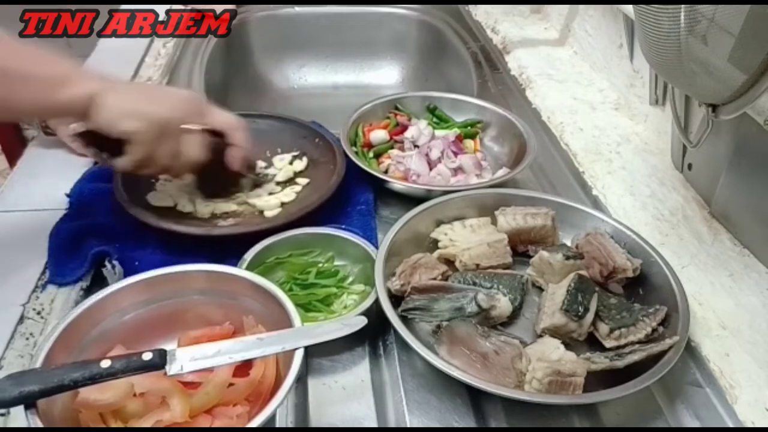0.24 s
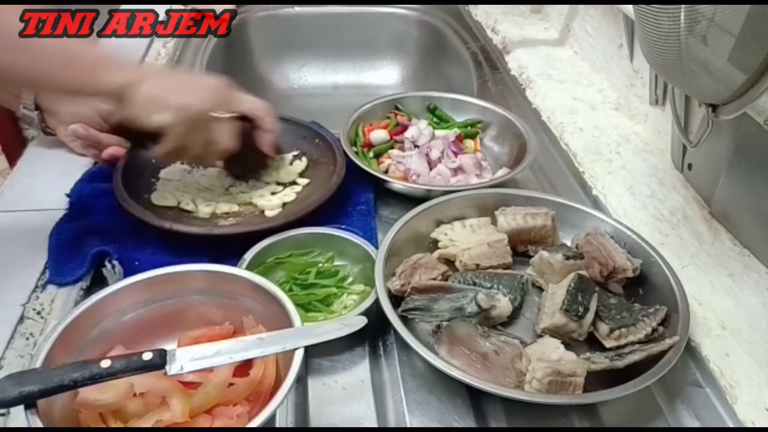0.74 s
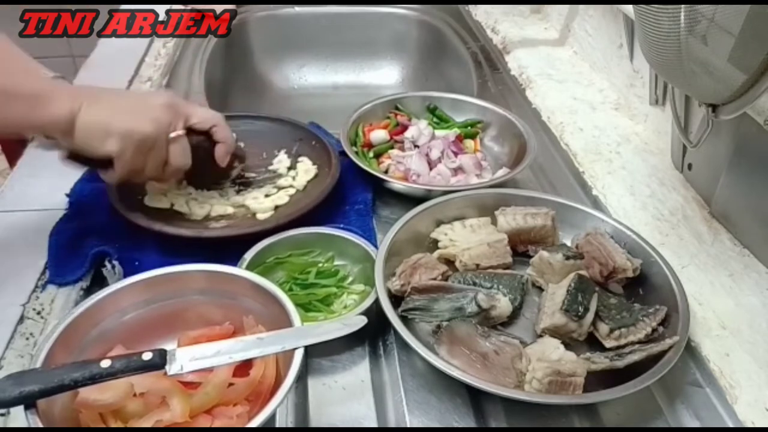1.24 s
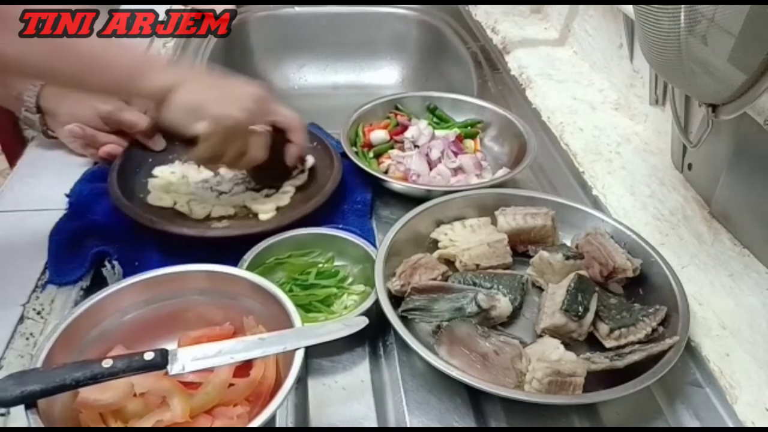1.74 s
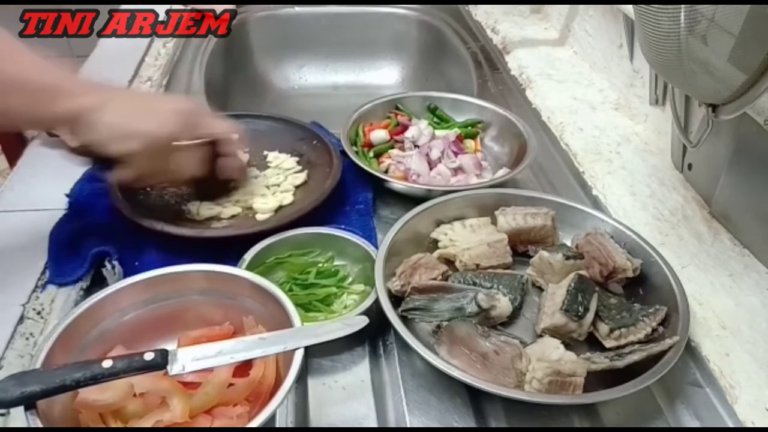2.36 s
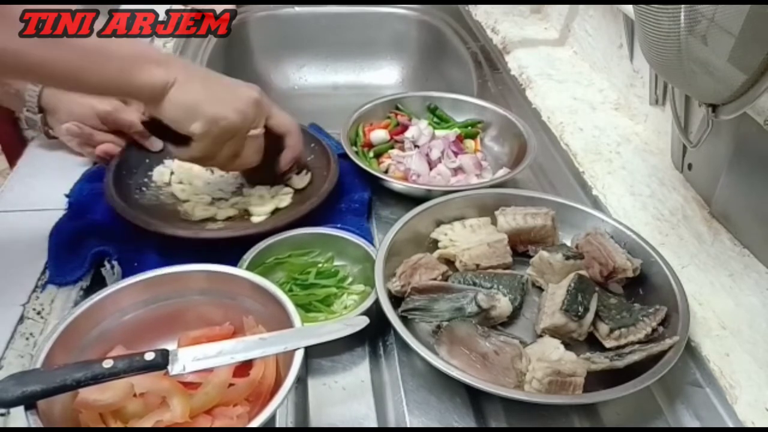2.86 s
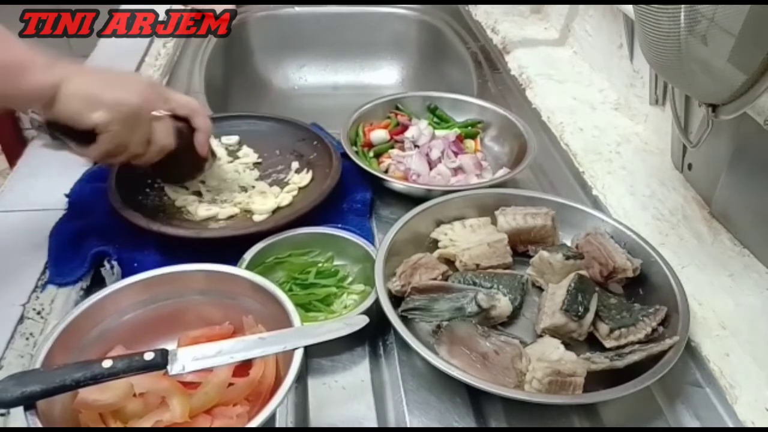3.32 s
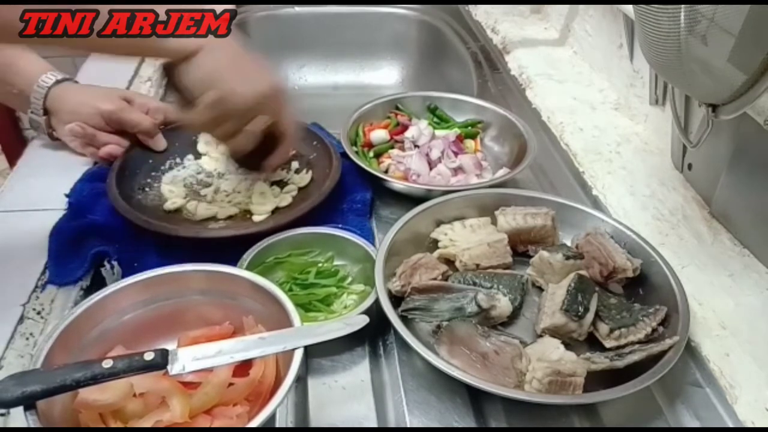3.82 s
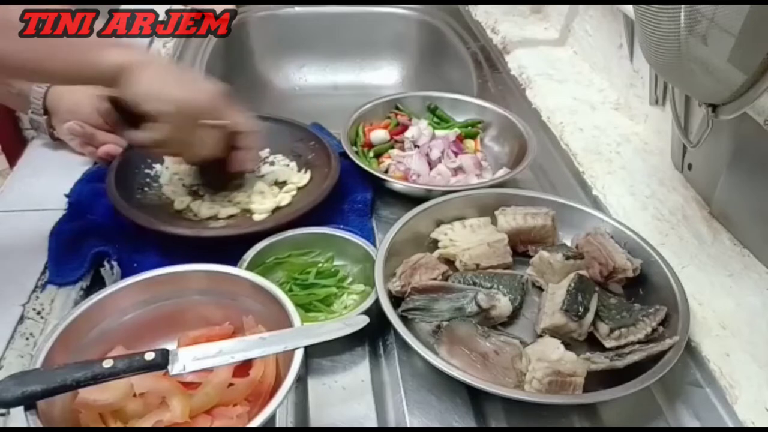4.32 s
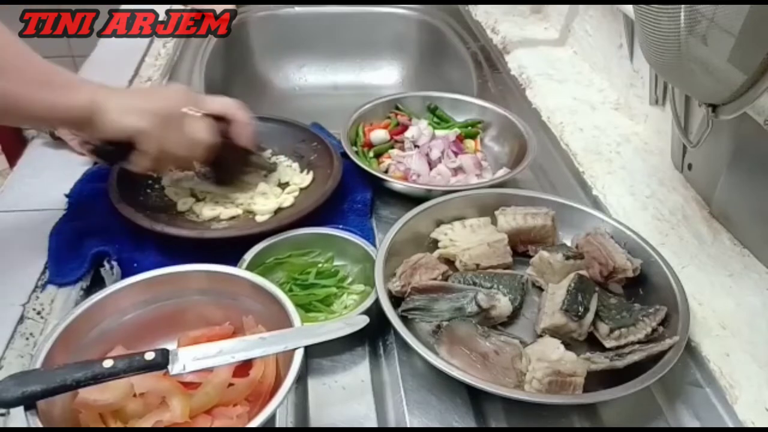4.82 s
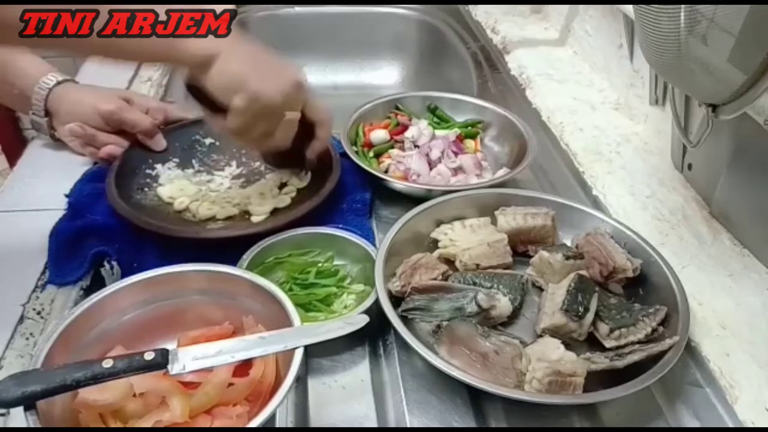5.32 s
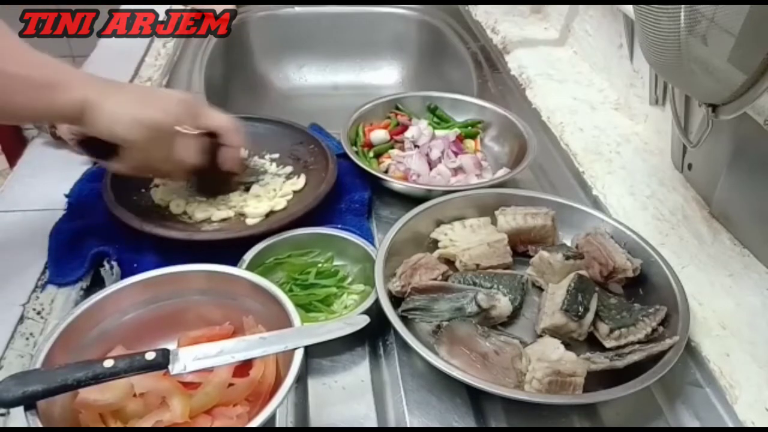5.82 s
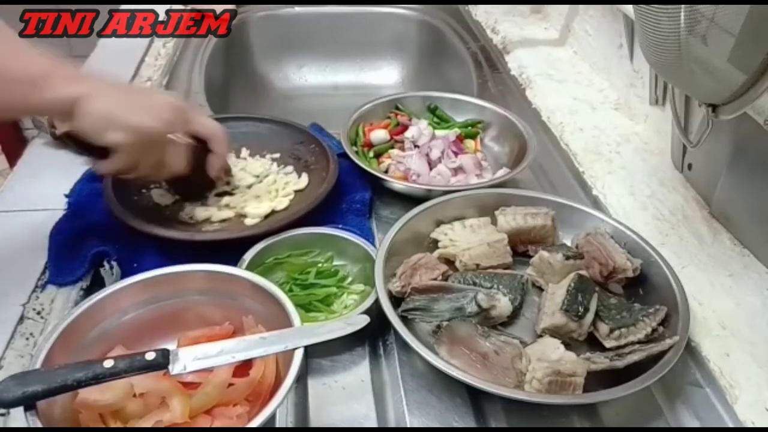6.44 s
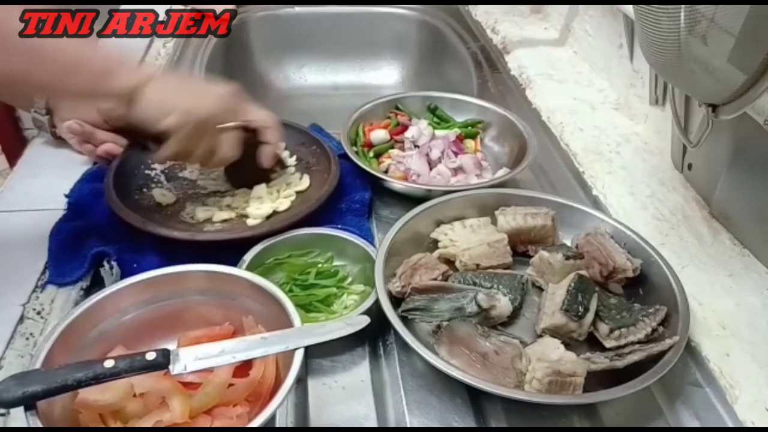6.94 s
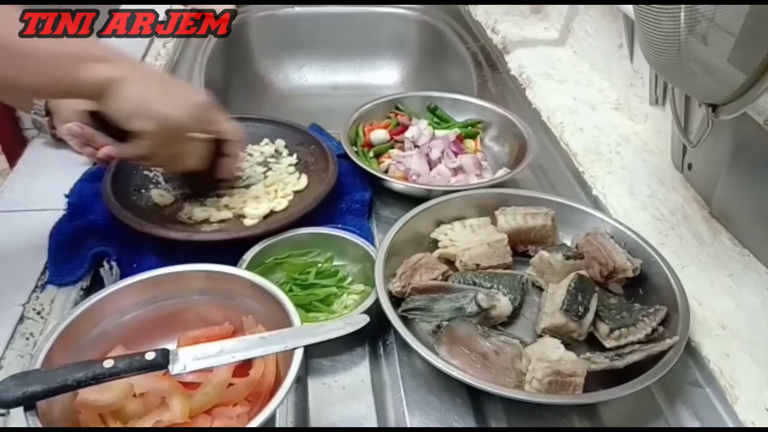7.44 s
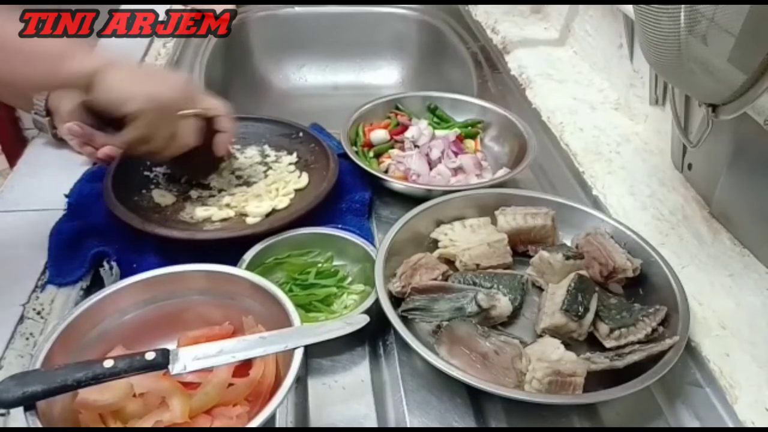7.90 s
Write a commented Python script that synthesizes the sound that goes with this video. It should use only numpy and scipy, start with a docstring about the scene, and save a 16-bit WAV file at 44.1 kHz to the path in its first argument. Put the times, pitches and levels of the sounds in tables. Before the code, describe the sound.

In a small kitchen, garlic is crushed close to the microphones, slightly to the left. Two sharp stone knocks come early, among quick scraping strokes of a pestle on a flat mortar. The gritty, moist grinding carries on throughout, broken by short lifts, further clacks and a few tiny squeaks and crunches. The mortar thuds softly on the counter, and nearby steel bowls ring faintly over a quiet low hum.

```python
"""Crushing garlic in a stone mortar

A stone pestle lands with a knock on a flat mortar, which sits on a cloth beside a steel sink.
It rubs to and fro: grit rasps, the slab rumbles under the weight, wet pulp fizzes, the stone squeaks.
Cloves burst, the rocking mortar thuds on the counter and steel bowls ring faintly in sympathy.
A small kitchen with a low drone surrounds a close pair of microphones."""
import sys
import numpy as np
from scipy import signal
from scipy.fft import rfft, irfft
from scipy.io import wavfile
from scipy.ndimage import uniform_filter1d

SR = 44100
rng = np.random.default_rng(int(sys.argv[2]) if len(sys.argv) > 2 else 0)


def wav_out(sig):
    """Save sig, one row per channel (or a flat mono array), as 16-bit PCM at SR to the path in sys.argv[1]."""
    wavfile.write(sys.argv[1], SR, np.round(np.clip(np.atleast_2d(sig).T, -1, 1) * 32767).astype(np.int16))


N = 360297
HZ = np.fft.rfftfreq(8192, 1 / SR)  # frequency axis of the filter spectra


# Rubs: t/s of peak speed, rise/s, fall/s, grit level/dB, slab and pulp level/dB relative to the grit
RUBS = [(0.004, 0.025, 0.05, -53, -6, -7), (0.144, 0.049, 0.074, -44.5, 1.5, -12.0),
        (0.212, 0.054, 0.032, -46, -10, 6), (0.256, 0.02, 0.025, -38.5, -19, -2.5),
        (0.355, 0.11, 0.066, -34.5, -7.5, -5), (0.482, 0.036, 0.074, -45.5, -4.5, 2.0),
        (0.587, 0.051, 0.16, -33, -6.0, -8.5), (0.925, 0.019, 0.036, -47, -5, 5.5),
        (0.995, 0.078, 0.067, -35, -6.0, -1), (1.077, 0.037, 0.053, -49, -6.0, 4),
        (1.201, 0.048, 0.073, -43.5, -14, 5.5), (1.368, 0.065, 0.059, -31, -6.5, -4),
        (1.512, 0.094, 0.064, -40.0, -9.5, 0.0), (1.605, 0.04, 0.072, -31.5, -6.0, -9.5),
        (1.903, 0.076, 0.074, -40.5, -3.5, 1.5), (2.035, 0.09, 0.072, -28, -6.0, -8.5),
        (2.347, 0.054, 0.093, -51.5, 8, 4.5), (2.402, 0.068, 0.15, -28, -6.5, -11.5),
        (2.592, 0.067, 0.055, -44, -13.5, -1), (2.659, 0.024, 0.043, -39, -8, -7),
        (2.717, 0.029, 0.085, -33.5, -6.5, -7.5), (2.927, 0.016, 0.1, -47.5, 8.5, -9),
        (2.984, 0.043, 0.14, -41.5, -8, 2), (3.142, 0.071, 0.081, -28.5, -7.5, -9),
        (3.284, 0.049, 0.075, -33.0, -5, -7), (3.416, 0.056, 0.078, -28.5, -6.0, -9.5),
        (3.778, 0.076, 0.078, -28, -4.5, -10.0), (3.923, 0.035, 0.073, -30.5, -8.5, -5.5),
        (4.053, 0.045, 0.12, -33, -6, -7.5), (4.286, 0.027, 0.12, -47, 1.5, -5),
        (4.364, 0.066, 0.061, -37, -1.5, 1.5), (4.487, 0.058, 0.13, -33.5, -6, -4.5),
        (4.651, 0.035, 0.059, -27.0, -7.5, -11.0), (4.787, 0.072, 0.1, -32.0, -7, -8),
        (5.093, 0.036, 0.047, -41, 0, -7), (5.186, 0.074, 0.089, -28.0, -4, -9.5),
        (5.394, 0.094, 0.039, -41.5, -11, -2.5), (5.512, 0.09, 0.075, -34.5, -3, -9),
        (5.701, 0.034, 0.083, -46.5, 7.5, -6), (5.763, 0.072, 0.062, -41.5, -2.5, 1),
        (5.919, 0.087, 0.068, -31.0, -7, -11.0), (6.063, 0.064, 0.062, -34, -1.5, -10),
        (6.188, 0.064, 0.084, -33.5, -3.5, -10), (6.462, 0.019, 0.031, -40.0, 4.5, -1.0),
        (6.565, 0.073, 0.082, -29.5, -7, -8), (6.753, 0.057, 0.06, -36.5, -10.5, -8),
        (6.892, 0.13, 0.07, -34.5, -4, -9), (7.14, 0.088, 0.03, -42.5, 1, -3.5),
        (7.254, 0.078, 0.088, -31.0, -5.5, -12), (7.498, 0.067, 0.42, -40, -8.5, -5),
        (7.603, 0.096, 0.14, -34.5, -3, -11), (7.781, 0.036, 0.088, -35.5, -8.5, -10.5),
        (7.92, 0.1, 0.12, -38.0, -1.5, -9.5), (8.152, 0.041, 0.037, -46.0, 0.0, -13)]
# Friction spectra of grit, loaded slab and wet pulp: f/Hz, level/dB
GRIT_SPECTRUM = [(300, -36.5), (700, -26), (1100, -10), (1800, -1.5), (2400, 1.5), (3000, -3), (3800, -6),
                 (5000, -12.5), (8000, -58.5), (16000, -70)]
SLAB_SPECTRUM = [(30, -27), (60, -13), (90, -1.5), (170, -10.5), (290, 3), (390, -2.5), (550, -4.5),
                 (800, -8.5), (1150, -9.5), (1700, -8.5), (4000, -53)]
PULP_SPECTRUM = [(1500, -29), (3000, 0.5), (4000, -3), (5200, -1.5), (6300, -2), (7200, -7.5),
                 (8300, -13.5), (10000, -22.5), (13000, -28), (15500, -24.5)]
def rubbing():
    """Sliding friction: the strokes of the arm modulate the noise of grit, slab and pulp together."""
    slab_db, pulp_db = np.transpose(RUBS)[-2:]
    light = pressure(np.zeros(len(RUBS)), growth=1, lag_s=0)
    heavy = pressure(slab_db, growth=1.09, lag_s=0.0044)  # the slab answers late, most to hard pressure
    wet = pressure(pulp_db, growth=0.79, lag_s=-0.0024)  # pulp fizzes early, even under a light touch
    wet = np.hypot(wet, squishes())
    grit = light * friction(fractures(per_s=2600, spread_db=3.5), GRIT_SPECTRUM)
    slab = amp(-1) * heavy * friction(fractures(per_s=3600, spread_db=3), SLAB_SPECTRUM)
    pulp = amp(-0.27) * wet * friction(fractures(per_s=2200, spread_db=4.5), PULP_SPECTRUM)
    pulp *= flutter(rate_hz=270, depth_db=0.46)
    pitted_stone = flutter(rate_hz=130, depth_db=0.76)
    return contact() * (grit + slab + pulp) * pitted_stone


def pressure(offsets_db, growth, lag_s, swing_db=20):
    """Incoherent addition: the swells of the rubs sum in power; growth steepens their flanks."""
    t, power = np.arange(0, N, 64) / SR, 0
    for (s, rise, fall, db, _, _), offset_db in zip(RUBS, offsets_db):
        age = t - s - lag_s
        from_peak = np.where(age < 0, abs(age / rise) ** 1.73, abs(age / fall) ** 1.32)
        power += amp(db + offset_db - growth * swing_db * from_peak) ** 2
    return np.interp(np.arange(N) / SR, t, np.sqrt(power))


def fractures(per_s, spread_db):
    """Shot noise: tiny fractures form a random impulse train, many small and a few large."""
    size = amp(spread_db * np.minimum(rng.exponential(1, N), 4))
    return unit(size * rng.choice([-1, 1], N) * (rng.random(N) < per_s / SR))


# Resonances of the mortar: f/Hz, bandwidth/Hz, gain/dB
MORTAR_MODES = [(229, 57, 6.0), (297, 26, 5.0), (382, 18, -5.0), (482, 105, 8.5), (588, 32, 8.0),
                (634, 30, 5.0), (720, 99, 5.5), (885, 87, 6.5), (973, 19, -3.0), (1078, 27, 3.5),
                (1214, 105, 6.0), (1373, 22, 4.5), (1607, 18, -2.0), (1776, 52, 6.5), (1881, 30, 4.0),
                (1967, 111, 5.0), (2073, 30, 4.0), (2181, 24, 3.0), (2336, 125, 5.5), (2442, 160, 4.0),
                (2603, 50, 2.5), (2788, 31, 4.0), (3475, 224, 5.0), (4612, 297, 3.0), (6068, 611, 7.5),
                (7895, 515, 3.0)]
def friction(train, spectrum):
    """Forced vibration: fractures drive the modes of the stone, heard directly and scattered."""
    stone = colour(train, read(spectrum) + resonances(MORTAR_MODES))
    return unit(amp(-3.5) * direct(stone) + scatter(stone))


# Lifts of the pestle: t/s of leaving, t/s of touching again, squish level/dB
PESTLE_LIFTS = [(0.03, 0.092, -52), (0.649, 0.874, -51), (1.115, 1.155, -45), (1.77, 1.806, -70),
                (2.14, 2.283, -57), (2.82, 2.912, -46.5), (3.542, 3.659, -51), (4.14, 4.265, -46.5),
                (4.867, 5.046, -59), (5.58, 5.676, -52), (6.295, 6.447, -50), (7.353, 7.44, -49),
                (8.025, 8.118, -48.5)]
def contact(peel_db_per_s=129, touch_s=0.003):
    """Adhesion: contact (0 to 1) fades as the pestle peels off sticky pulp and returns on landing."""
    t, touch = np.arange(N) / SR, np.ones(N)
    for leaves, lands, _ in PESTLE_LIFTS:
        lifted = (t > leaves) & (t < lands + touch_s)
        peeling = amp(-peel_db_per_s * (t[lifted] - leaves))
        landing = np.clip((t[lifted] - lands) / touch_s, 0, 1)
        touch[lifted] = np.maximum(peeling, landing)
    return touch


def squishes(decay_s=0.012):
    """Squeeze flow: each touch-down presses out a spurt of fizz, given here as an envelope."""
    t, envelope = np.arange(SR // 5) / SR, np.zeros(N)
    for _, lands, db in PESTLE_LIFTS:
        add(envelope, lands, amp(db) * np.exp(-t / decay_s))
    return envelope


# The pestle lands or trips: t/s, level/dB, contact cutoff f/Hz, relative click level/dB
IMPACTS = [(0.0934, -0.5, 3420, -4.5), (0.106, -10, 2370, -4), (0.250, -26, 5000, -8),
           (0.8800, 0.5, 3930, 6.5), (1.160, -41, 7000, -10), (1.345, -13.5, 4000, -8),
           (1.570, -27, 5000, -10), (1.895, -32, 2000, -9), (2.325, -15.5, 2500, 1),
           (2.354, -9.5, 3000, -9), (2.649, -17.5, 4000, -15), (2.9137, -15, 5500, 0),
           (3.715, -18.5, 5000, -9), (3.908, -31, 3500, -12), (4.269, -17, 3020, 0),
           (4.281, -13.5, 1200, -2), (4.445, -27, 5004, -11), (4.617, -24, 4000, -12),
           (4.644, -9.5, 3500, 0), (5.0434, 1, 3400, 7.5), (5.141, -10, 4000, -11), (5.6765, -7, 1670, 5),
           (5.692, -12.5, 1290, -11), (6.4453, -16, 4500, -1), (6.452, -10.5, 1370, -1),
           (6.521, -7.5, 4003, -14), (7.106, -13.5, 2560, -6), (8.118, -22, 5610, -1)]
# Spectrum of an impact: f/Hz, level/dB
IMPACT_SPECTRUM = [(40, -54.5), (150, -13.5), (350, -13.5), (550, -1.5), (1000, 1.5), (1600, 3), (2400, 3),
                   (3300, -6), (4500, -7), (6000, -13.5), (7300, -14.5), (9000, -27.5), (15000, -41.5)]
# Resonances of the pestle: f/Hz, bandwidth/Hz, gain/dB
PESTLE_MODES = [(631, 210, 2.5), (1670, 150, 4), (2115, 130, -10), (2340, 250, 8.5), (3270, 240, 10.5),
                (4040, 210, -3), (4580, 420, 7), (5300, 440, -13.5), (5850, 450, 12.5), (7330, 290, 11)]
def knocks():
    """Impact of stone on stone: a click and a short ring; garlic in between lowers the cutoff."""
    rings, clicks = np.zeros((2, N))
    body = resonances(PESTLE_MODES) + 0.5 * resonances(MORTAR_MODES)
    for s, db, cutoff_hz, click_db in IMPACTS:
        blow = read(IMPACT_SPECTRUM) - 10 * np.log10(1 + (HZ / cutoff_hz) ** 4)
        add(rings, s, amp(db + 5) * response(blow + body))
        add(clicks, s, amp(db + click_db - 4) * response(blow))
    return direct(clicks) + scatter(rings)


# The stone catches, and once a bowl rings (the first row, a faint 700 Hz steel ring while the pestle is
# lifted): t/s of the middle, duration/s, level/dB, f/Hz, half-width/Hz
STICK_SLIPS = [(.715, 0.097, -60, 703, 25), (2.385, 0.076, -34, 2470, 200), (2.401, .11, -36, 790, 450),
               (2.447, .04, -25.5, 6080, 150), (2.478, 0.041, -35.5, 1400, 50.5),
               (3.915, 0.048, -29.5, 1830, 200), (4.292, 0.051, -39.5, 760, 120),
               (5.012, 0.067, -67, 3520, 149), (5.622, 0.034, -49, 2520, 70), (6.4, .03, -65, 4500, 150),
               (7.512, 0.15, -38, 970, 348), (7.598, 0.087, -37.5, 735, 400),
               (8.056, 0.2, -57.5, 723, 69.4), (8.153, 0.049, -42.5, 850, 91)]
def squeaks():
    """Stick-slip friction: irregular slips feed one narrow resonance for a moment; the same shape gives the one
    short ring of a bowl."""
    out = np.zeros(N)
    for s, length, db, hz, width in STICK_SLIPS:
        ring = response(-20 * np.log10(1 + ((HZ - hz) / width) ** 2))
        slips = rng.standard_normal(len(ring) + int(length * SR))
        tone = signal.fftconvolve(slips, ring, "valid")
        add(out, s - length / 2, amp(db) * unit(tone) * np.hanning(len(tone)))
    return out


# A clove bursts: t/s, level/dB, time constant/s
CLOVE_BURSTS = [(0.092, -42, 0.0016), (0.208, -48, .008), (1.343, -52, .012), (2.431, -30, 0.01),
                (2.446, -39, 0.0066), (6.449, -51, 0.0043)]
def bursts():
    """Rupture: the cells of a clove tear in a bright crackle that decays exponentially."""
    t, envelope = np.arange(SR // 10) / SR, np.zeros(N)
    for s, db, decay_s in CLOVE_BURSTS:
        add(envelope, s, amp(db) * np.exp(-t / decay_s))
    bright = read([(1000, -15), (4000, -5), (7000, 8.5), (9000, -4.5), (15000, -16)])
    return envelope * colour(fractures(per_s=4200, spread_db=4), bright)


# The mortar rocks: t/s, level/dB
MORTAR_ROCKS = [(.345, -46), (.61, -53), (1.64, -43.5), (2.385, -46), (2.45, -47), (3.28, -49.5),
                (3.79, -46), (3.92, -49), (4.85, -49), (4.985, -54.5), (5.4, -55), (5.78, -53), (6.1, -50),
                (6.46, -50), (6.55, -46.5)]
# Spectrum of the counter: f/Hz, level/dB
COUNTER_SPECTRUM = [(25, -27), (45, -12), (58, -5.5), (70, -9), (85, 3), (105, 3.5), (135, -4.5),
                    (200, -21.5), (500, -67)]
def thuds(half_length_s=0.038):
    """Structure-borne sound: the rocking mortar pushes through its cloth and the counter booms."""
    t = np.arange(N) / SR
    push = sum(amp(db) * np.exp(-((t - s) / half_length_s) ** 2) for s, db in MORTAR_ROCKS)
    return push * rumble(COUNTER_SPECTRUM)


# Modes of the steel bowls: f/Hz, level/dB, T60/s
BOWL_MODES = [(1344, -5, 0.42), (1900, -13, 0.62), (2640, -16, 0.35), (4130, -12.5, 0.41),
              (4600, -20, 0.43), (5430, -13, 0.34), (5860, -16, 0.64), (6540, -16, 0.35)]
# The bowls are jogged: t/s, level/dB, f/Hz of strongest excitation
BOWL_JOGS = [(0.67, -42, 2940), (2.469, -38, 3980), (4.131, -45.5, 5500), (6.27, -56, 3700)]
def bowls(shake):
    """Sympathetic resonance: thin steel rings on after the strokes, and clinks when jogged."""
    t = np.arange(SR) / SR
    modes = np.array([amp(db - 60 * t / t60) * np.sin(2 * np.pi * hz * t) for hz, db, t60 in BOWL_MODES])
    out = amp(-62.5) * signal.oaconvolve(shake, modes.sum(0))[:N]
    for s, db, bright_hz in BOWL_JOGS:
        octaves_off = np.log2(np.array(BOWL_MODES)[:, 0] / bright_hz)
        add(out, s, amp(db - 10.6 * octaves_off ** 2) @ modes)
    return out


def direct(x, lag_samples=8):
    """Path difference: the mortar lies to the left, so its sound is later and weaker on the right."""
    return np.array([x, amp(-3.5) * np.pad(x, (lag_samples, 0))[:N]])


# Decay among sink and dishes: f/Hz, T60/s
SINK_DECAY = [(100, 0.082), (600, 0.13), (2000, 0.1), (6000, 0.067), (14000, 0.12)]
def scatter(x, size=8192):
    """Scattering: sink and dishes reflect in a pattern that shifts as hand and pestle move."""
    out, window = np.zeros((2, N)), np.sin(np.pi * np.arange(size) / size)
    for start in range(0, N, size // 2):
        piece = x[start:start + size]
        if np.any(piece):
            paths = echoes(SINK_DECAY, SR // 10)
            left, right = signal.fftconvolve([piece * window[:len(piece)]], paths, axes=1)
            add(out[0], start / SR, left)
            add(out[1], start / SR, right)
    return out


# Decay between the kitchen walls: f/Hz, T60/s
ROOM_DECAY = [(100, 0.17), (500, 0.43), (2000, 0.34), (6000, 0.28), (14000, 0.26)]
def walls(spill):
    """Reverberation: the walls return the sound that spills into the room."""
    return signal.oaconvolve(spill, echoes(ROOM_DECAY, SR // 2), axes=1)[:, :N]


def echoes(t60, length, coherent_hz=380):
    """Diffuse field: dense reflections decay exponentially, their bass alike at both microphones."""
    hz, t, (left, other) = signal.stft(rng.standard_normal((2, length)), SR, nperseg=256)
    coherence = (1 / (1 + (hz / coherent_hz) ** 4))[:, None]
    right = coherence * left + np.sqrt(1 - coherence ** 2) * other
    decay = amp(-60 * t / read(t60, hz)[:, None])
    tail = signal.istft(np.array([left, right]) * decay, SR, nperseg=256)[1]
    tail *= np.clip(np.arange(tail.shape[1]) / SR / 0.00068 - 0.5, 0, 1)  # follows the direct sound
    return tail / np.linalg.norm(tail, axis=1, keepdims=True)


# Spectra of the drone of the house and of the air: f/Hz, level/dB
DRONE_SPECTRUM = [(25, -48), (45, -16), (58, -0.5), (70, -20), (85, 2.5), (105, 3.5), (128, 2), (160, -10),
                  (220, -11), (500, -61.5)]
AIR_SPECTRUM = [(30, -5), (200, -8), (500, -3.5), (1000, -7), (2200, -11), (4000, -18.5), (6500, -21),
                (9000, -44), (15000, -52)]
def background():
    """Ambient noise: a wavering low drone, alike on both sides, and faint uncorrelated air."""
    drone = amp(-57) * rumble(DRONE_SPECTRUM) * flutter(rate_hz=6, depth_db=1.6)
    air = np.array([colour(rng.standard_normal(N), read(AIR_SPECTRUM)) for side in range(2)])
    return drone + amp(-68.5) * air


def rumble(spectrum):
    """Envelope normalisation: filtered noise divided by its running rms keeps an even strength."""
    noise = colour(rng.standard_normal(N), read(spectrum))
    return noise / np.sqrt(uniform_filter1d(noise ** 2, size=4000) + 1e-3)


def flutter(rate_hz, depth_db):
    """Random amplitude modulation: a gain of rms 1 with fluctuations up to rate_hz."""
    bumps = signal.resample(rng.standard_normal(int(2 * rate_hz * N / SR)), N)
    return unit(amp(depth_db * bumps))


def resonances(modes):
    """Lorentzian peaks and dips, summed to a spectrum in dB."""
    return sum(db / (1 + (2 * (HZ - hz) / width) ** 2) for hz, width, db in modes)


def response(db):
    """Minimum phase: the causal impulse response of energy 1 with the given spectral shape."""
    log_gain = np.log(amp(np.r_[db, db[-2:0:-1]]))
    spectrum = np.exp(np.conj(signal.hilbert(log_gain)))[:len(db)]
    taps = irfft(spectrum)[:len(db) // 2]
    return taps / np.linalg.norm(taps)


def colour(x, db):
    """Convolution imposes a spectral shape on a signal."""
    return signal.oaconvolve(x, response(db))[:N]


def read(points, hz=HZ):
    """Interpolation of a table along a log-frequency axis."""
    f, value = np.transpose(points)
    return np.interp(np.log(hz + 1), np.log(f + 1), value)


def amp(db):
    """Amplitude ratio of a level in dB."""
    return 10 ** (np.asarray(db) / 20)


def unit(x):
    """Normalisation to rms 1."""
    return x / np.sqrt(np.mean(x ** 2) + 1e-20)


def add(mix, s, sound):
    """Superposition of a sound on the mix at time s."""
    part = mix[max(round(s * SR), 0):][:len(sound)]
    part += sound[:len(part)]


def scene():
    """Superposition: the work at the mortar excites bowls and walls, over the background."""
    accents, blows = squeaks() + bursts(), knocks()
    grinding = rubbing() + amp(-4.5) * direct(accents) + scatter(accents)
    steel = bowls(grinding[0] + blows[0])
    spill = amp(-17.5) * grinding[:1] + amp(-12.5) * blows[:1]
    return grinding + blows + steel + walls(spill) + thuds() + background()


# Imbalance of the microphones: f/Hz, left minus right level/dB
MIC_IMBALANCE = [(100, 0.5), (300, -1.5), (500, 1), (800, 6), (1200, -0.5), (1800, 1.5), (2500, 3),
                 (3500, 2), (4500, 0), (5700, 5.5), (7000, 1), (9000, -1.5), (14000, -2)]
def record(dry, low_cut_hz=30, high_cut_hz=15650):
    """Frequency response: each microphone has its own colour within a limited band."""
    hz = np.fft.rfftfreq(N, 1 / SR)
    lean_db = read(MIC_IMBALANCE, hz)
    low_cut = hz ** 3 / (hz ** 3 + low_cut_hz ** 3)
    heard = irfft(rfft(dry) * low_cut * amp([lean_db / 2, -lean_db / 2]), N)
    high_cut = signal.firwin(511, high_cut_hz, window=("kaiser", 9), fs=SR)
    return signal.oaconvolve(heard, high_cut[None], "same")


dry = scene()
out = record(dry)
wav_out(out)
```